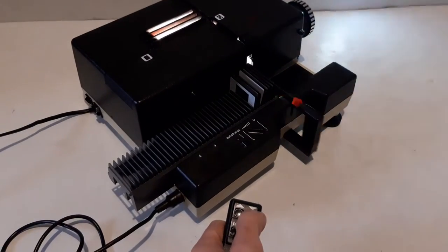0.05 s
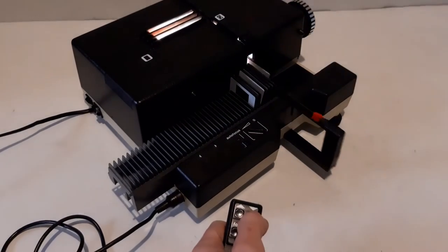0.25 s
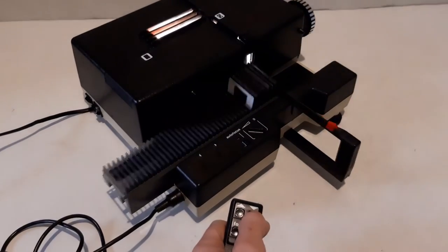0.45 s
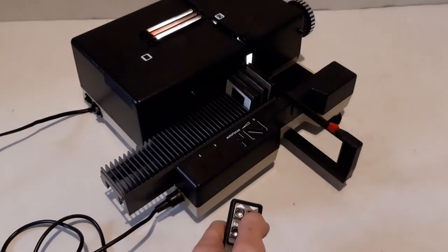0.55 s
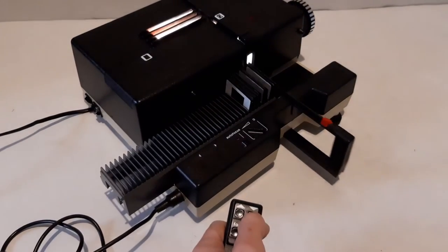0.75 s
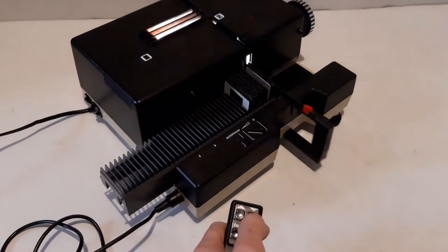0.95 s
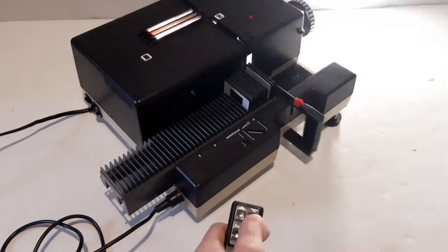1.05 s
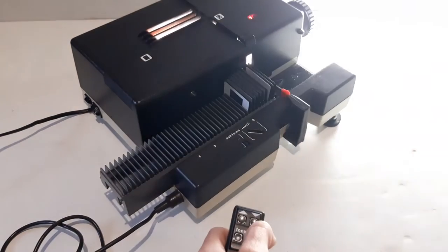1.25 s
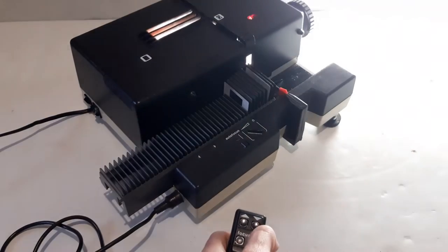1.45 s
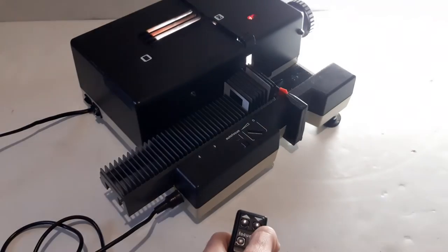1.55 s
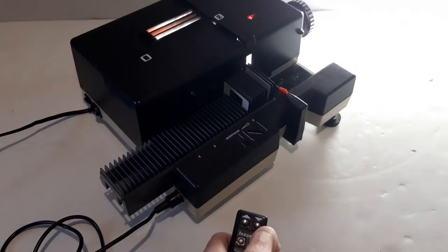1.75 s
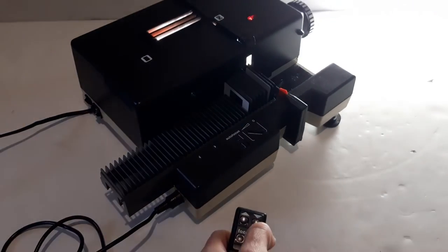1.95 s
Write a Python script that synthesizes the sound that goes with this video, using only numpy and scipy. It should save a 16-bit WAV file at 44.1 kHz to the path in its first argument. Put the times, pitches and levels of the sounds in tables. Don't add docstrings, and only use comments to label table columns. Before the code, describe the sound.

A slide projector changes a slide: motor grind, light clicks, a scrape and sharp burst of clacks near half a second, then smaller knocks, over steady fan rush and hum, close stereo phone microphone in a small room.

```python
import sys
import numpy as np
from scipy import signal
from scipy.fft import rfft, irfft
from scipy.io import wavfile
from scipy.ndimage import uniform_filter1d

SR = 44100
rng = np.random.default_rng(int(sys.argv[2]) if len(sys.argv) > 2 else 0)


def magnitude_from_level(level_db):
    exponent = np.asarray(level_db, float) / 20
    return 10 ** exponent


def dump_mix(stems):
    frames = np.atleast_2d(stems).T
    limited = np.clip(frames, -1, 1)
    pcm = np.round(limited * 32767).astype(np.int16)
    wavfile.write(sys.argv[1], SR, pcm)


N = 88200

# frequency in Hz, density in dB per Hz.
AIR_COLOUR = [(25, -57), (70, -21.5), (150, -15.5), (400, -5.5), (1200, -15), (3800, -34.5), (7600, -43),
              (8600, -59), (15800, -52.5)]
# centre in Hz, width in Hz, level in dB.
CASE_RESONANCES = [(262, 75, -56.5), (339.8, 17.1, -50), (381.4, 17, -48), (453.8, 16, -60.5),
                   (525.8, 9.7, -53.5), (665, 36, -53), (833.5, 5, -54), (1045, 54, -60),
                   (1734, 220, -62.5), (2800, 67, -69), (3700, 960, -62.5)]
# time in seconds, motor in dB, arm drag in dB.
CHANGER_DRIVE = [(0, -13, -1), (0.122, -2.5, 5.5), (.22, -5, 1.5), (0.299, -3, 7), (.37, -16, -5.5),
                 (.42, -16, 8.5), (0.468, 1, 14), (.52, 6, 23.5), (.57, -3, 18.5), (.63, -1, -6.5),
                 (0.798, -5.5, 7), (.88, -8, -7), (1.0, 1, 13), (1.069, -4, -1), (1.3, -7.5, -5),
                 (1.41, -3.5, -16), (1.48, -13, 0), (1.6, -44, -37)]
# centre in Hz, width in Hz, level in dB.
GEARBOX_RESONANCES = [(530, 25.5, -41.5), (809, 9.5, -55.5), (1038, 13, -58), (1150, 43, -62.5),
                      (373.3, 65, -40.5)]
# frequency in Hz, density in dB per Hz.
DRAG_COLOUR = [(70, -62), (400, -8), (1000, 9), (3500, -4), (7400, -8.5), (8500, -16.5), (12000, -14.5),
               (15500, -22)]
# start in seconds, rms level of the first 4.5 ms in dB, pitch of the
# struck part in Hz, treble tilt in dB per octave, rattle after the blow in dB.
KNOCK_EVENTS = [(0.2049, -28.5, 1450, -4.5, -11), (.269, -34, 690, 0, -29),
                (0.3039, -27.5, 397, -2.5, -3.5), (0.3989, -32.5, 2830, -0.5, -15),
                (0.4086, -22, 1710, 0, -5.5), (0.436, -35, 14500, 7, -21), (.4434, -26.5, 2410, -3, 0),
                (0.48, -22.5, 4060, -3.5, -21), (0.4868, -17, 4020, 5, -8), (.4915, -9.5, 5850, -2, -17),
                (0.495, -13, 1430, -5, -17), (0.512, -20, 1150, -11, -12), (.541, -48, 12170, -9, -14),
                (0.5482, -19.5, 4240, 1.5, -16.5), (0.7389, -28, 1430, 2.5, -40),
                (0.7852, -36, 815, -27, -8), (0.9059, -32, 940, -3, -16), (.9142, -24.5, 1450, -2.5, -4),
                (.921, -28, 950, -9, -8), (0.9758, -19.5, 3800, 8, -6.5), (0.977, -20, 1540, 1, -17),
                (1.389, -31.5, 1900, -6, -10), (1.3908, -32, 3700, 0, -10), (1.4279, -26, 4000, 0, 4)]
# frequency in Hz, level in dB, t60 in seconds.
BODY_MODES = [(360, -24, 0.053), (1026.5, 6, 0.09), (1450, 3, 0.061), (1900, -1, 0.032),
              (2164, -10.5, 0.051), (2862, 0.5, 0.036), (3660, -15, 0.011), (4140, 0, 0.027),
              (4263, -14, 0.011), (5620, -1.5, 0.039), (5950, -13, 0.009), (7215, -8, 0.02),
              (8460, -45, 0.016), (11550, -17, 0.0045)]
# frequency in Hz, density in dB per Hz.
CRACK_COLOUR = [(120, -30), (200, -10), (577, -6.5), (879, -6), (1490, -8.5), (2680, -11.5), (5780, -19),
                (8490, -37), (15800, -25)]

AIR_DB, CASE_FLICKER_DB = -44, 1.5
HUM_HZ, HUM_DB, HUM_PAN_DB = 101.4, -56.5, 7
DRAG_DB, DRAG_FLICKER_DB, DRAG_GRAIN_DB = -53, 1.5, 2
CRACK_DB, PART_DB, BODY_DB, SCATTER_DB, KNOCK_DB = 8.5, 16.5, 12, 1.5, -4
PART_Q, BLOW_S, EVENNESS = 7, 0.0009, 0.7
RATTLE_T60_S, GRIT_DB, RATTLE_RING_DB = 0.11, 1, -13
ROOM_DB, ROOM_T60_S = -14, 0.24
ALIKE_HZ, LAG_S, PAN_DB = 1620, 0.00005, 1.5
TOP_HZ = 15650


def level(x, db):
    return x * magnitude_from_level(db) / np.sqrt(np.mean(x ** 2))


def curve(hz, points):
    point_hz, point_db = np.array(points, float).T
    return magnitude_from_level(np.interp(np.log(hz + 1), np.log(point_hz), point_db))


def peak(hz, centre_hz, width_hz):
    return 1j * hz * width_hz / (centre_hz ** 2 - hz ** 2 + 1j * hz * width_hz)


def walk(rate_hz):
    hold = int(SR / rate_hz)
    steps = np.repeat(rng.standard_normal(N // 100), hold)[:N]
    return 1.22 * uniform_filter1d(uniform_filter1d(steps, hold), hold)


def pair(mid, side, hz):
    share = np.sqrt(np.clip(0.02 + (hz / ALIKE_HZ) ** 2, 0, 1))
    return mid + share * side * np.array([[1], [-1]])


def noise(gain):
    size = gain.size * 2 - 2
    mid, side = rfft(rng.standard_normal((2, size)))
    return irfft(gain * pair(mid, side, np.arange(gain.size) * SR / size), size)


def bands(points, flicker_db, rate_hz):
    hz = np.fft.rfftfreq(N, 1 / SR)
    octave = np.log2(hz + 1)
    total = np.zeros((2, N))
    for k in range(4, 15):
        window = np.cos(np.clip(octave - k, -1, 1) * np.pi / 2)
        total += noise(curve(hz, points) * window) * magnitude_from_level(flicker_db * walk(rate_hz))
    return total


def rings(table, flicker_db, rate_hz):
    hz = np.fft.rfftfreq(N, 1 / SR)
    total = np.zeros((2, N))
    for centre_hz, width_hz, db in table:
        ring = level(noise(peak(hz, centre_hz, width_hz) ** 2), db)
        total += ring * magnitude_from_level(flicker_db * walk(rate_hz))
    return total


def grit(db, size):
    return magnitude_from_level(db * np.clip(rng.exponential(size=size), 0, 4))


def room(x):
    t = np.arange(SR // 2) / SR
    decay = magnitude_from_level(-60 * t / ROOM_T60_S) * np.clip(t / 0.002, 0, 1)
    mid, side = rfft(rng.standard_normal((2, t.size)) * decay)
    tail = irfft(pair(mid, side, np.fft.rfftfreq(t.size, 1 / SR)))
    tail = signal.lfilter([0.5], [1, -0.5], tail)
    return signal.fftconvolve(x, tail / np.sqrt(np.sum(tail ** 2) / 2), axes=1)[:, :N]


def fan():
    t = np.arange(N) / SR
    air = level(bands(AIR_COLOUR, 0.76, 10.13), AIR_DB)
    case = rings(CASE_RESONANCES, CASE_FLICKER_DB, 5.78)
    hum = np.sqrt(2) * np.sin(2 * np.pi * HUM_HZ * t + 0.64) * magnitude_from_level(HUM_DB + 0.5 * walk(12.6))
    return air + case + hum * magnitude_from_level(np.array([[HUM_PAN_DB], [-HUM_PAN_DB]]) / 2)


def changer():
    t = np.arange(N) / SR
    time_s, motor_db, drag_db = np.array(CHANGER_DRIVE, float).T
    motor = magnitude_from_level(np.interp(t, time_s, motor_db))
    drag = magnitude_from_level(np.interp(t, time_s, drag_db))
    scrape = bands(DRAG_COLOUR, DRAG_FLICKER_DB, 29.75) * magnitude_from_level(DRAG_GRAIN_DB * walk(150))
    return motor * rings(GEARBOX_RESONANCES, 2.7, 12.62) + drag * level(scrape, DRAG_DB)


def struck_modes(hz, part_hz):
    modes = np.zeros(hz.size, complex)
    luck = rng.standard_normal(len(BODY_MODES))
    for k, (mode_hz, db, t60_s) in enumerate(BODY_MODES):
        width_hz = np.log(1000) / (np.pi * t60_s)
        gain = (-1) ** k * magnitude_from_level(db + BODY_DB + SCATTER_DB * luck[k])
        modes += gain * peak(hz, mode_hz, width_hz)
    part_gain = magnitude_from_level(CRACK_DB + PART_DB) * curve(part_hz, CRACK_COLOUR)
    return modes + part_gain * peak(hz, part_hz, part_hz / PART_Q)


def knocks():
    size, lead = 16384, 8
    out = np.zeros((2, N + size))
    t, hz = np.arange(size) / SR, np.fft.rfftfreq(size, 1 / SR)
    crack = magnitude_from_level(CRACK_DB) * curve(hz, CRACK_COLOUR)
    for start_s, db, part_hz, tilt_db, rattle_db in KNOCK_EVENTS:
        push = rng.standard_normal((4, size))
        blow = rfft(push[:2] * t / BLOW_S * np.exp(-t / BLOW_S))
        blow = blow * (np.sqrt(SR * BLOW_S / 4) / np.abs(blow)) ** EVENNESS
        rattle_fade = magnitude_from_level(rattle_db - 60 * t / RATTLE_T60_S)
        rattle = rfft(push[2:] * level(grit(GRIT_DB, size), 0) * rattle_fade)
        modes = struck_modes(hz, part_hz)
        mid, side = blow * (modes + crack) + rattle * (magnitude_from_level(RATTLE_RING_DB) * modes + crack)
        tilt = magnitude_from_level(tilt_db * np.log2((hz + 400) / 2000))
        low_cut = (1j * hz / (1j * hz + 150)) ** 2
        hit = irfft(pair(mid, side, hz) * tilt * low_cut, size)
        hit = np.roll(hit, lead, axis=1)
        hit = hit * np.clip(t / 0.0003, 0, 1) * np.clip(3 - 10 * t, 0, 1)
        k = int(start_s * SR) - lead
        out[:, k:k + size] += hit * magnitude_from_level(db + KNOCK_DB) / np.sqrt(np.mean(hit[:, :200] ** 2))
    return out[:, :N]


def scene():
    hits = knocks()
    panned_fan = fan() * magnitude_from_level(np.array([[PAN_DB], [-PAN_DB]]) / 2)
    near = hits + magnitude_from_level(ROOM_DB) * room(hits) + changer() + panned_fan
    lag = np.exp(-2j * np.pi * np.fft.rfftfreq(N, 1 / SR) * np.array([[0], [LAG_S]]))
    return irfft(rfft(near) * lag, N)


def band_limit(x):
    return signal.sosfilt(signal.butter(12, 16400, fs=SR, output="sos"), x)


def record(dry):
    top_cut = signal.ellip(8, 0.2, 70, TOP_HZ, fs=SR, output="sos")
    mix = signal.sosfilt(top_cut, dry)
    return band_limit(mix)


dry = scene()
out = record(dry)
dump_mix(out)
```